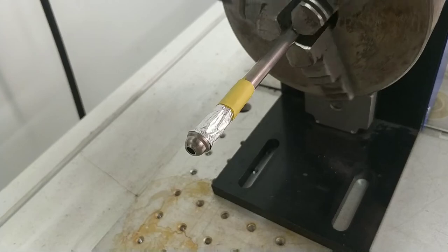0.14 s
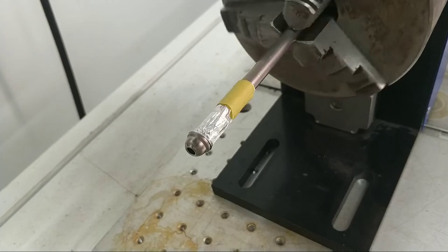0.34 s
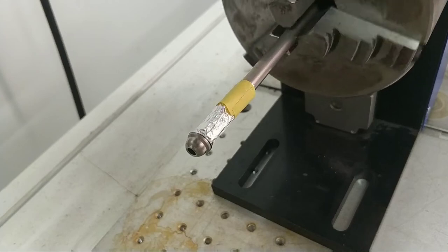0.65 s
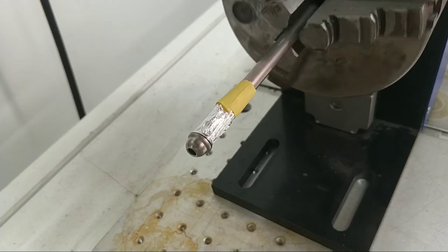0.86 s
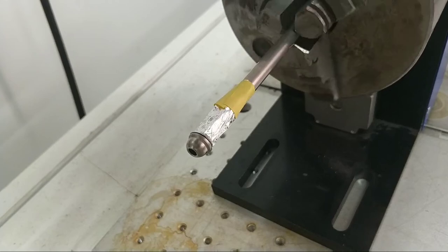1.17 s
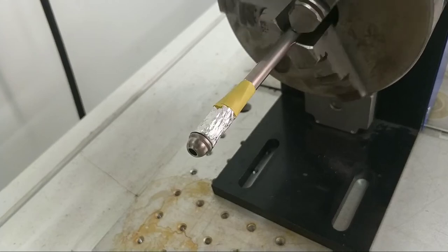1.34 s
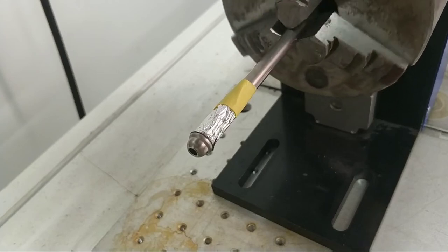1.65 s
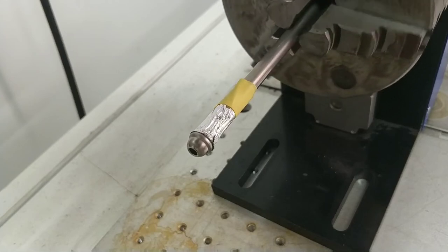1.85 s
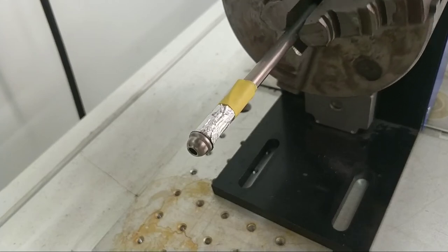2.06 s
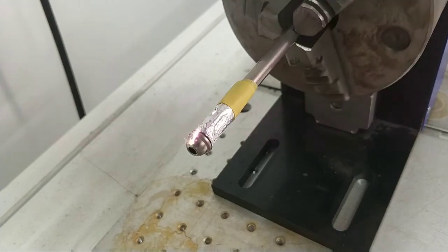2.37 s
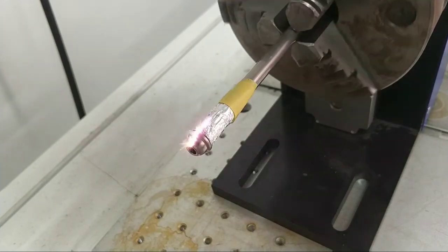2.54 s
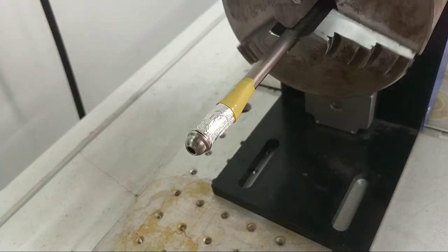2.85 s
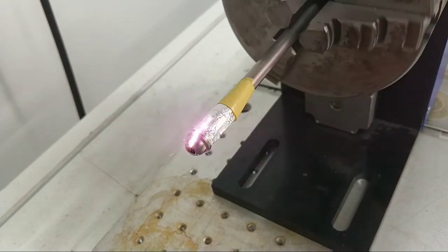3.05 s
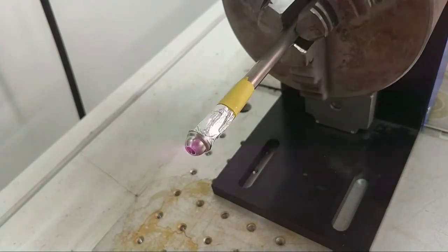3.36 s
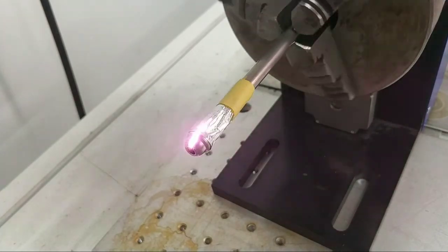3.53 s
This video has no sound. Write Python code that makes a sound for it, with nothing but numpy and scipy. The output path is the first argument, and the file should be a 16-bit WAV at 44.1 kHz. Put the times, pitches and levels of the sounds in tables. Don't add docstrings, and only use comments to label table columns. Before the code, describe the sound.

A laser crackles on a turning metal part in a workshop. After brief silence, a steady low fan hum with airy duct noise and thin motor whine fades in by 0.3 s. At about 2.2 s gas bursts into a fluttering hiss and sharp metallic snaps begin, roughly thirty per second in groups of three, making the hum throb. They weaken toward 3.7 s as the nearby phone lowers its gain.

```python
import sys
import numpy as np
from scipy import signal
from scipy.io import wavfile
from scipy.ndimage import uniform_filter1d

SR = 44100
rng = np.random.default_rng(int(sys.argv[2]) if len(sys.argv) > 2 else 0)


def transcribe(u):
    v = np.clip(np.atleast_2d(u).T, -1, 1)
    q = np.round(v * 32767).astype(np.int16)
    wavfile.write(sys.argv[1], SR, q)


def boost_factor(decibels):
    exponent = np.asarray(decibels, float) / 20
    return 10 ** exponent


N = 163170
T = np.arange(N) / SR

# t/s, level/dB
MIC_GAIN = [
    (0, -0.5),
    (1.9, -0.5),
    (2.2, -1),
    (2.6, -1.5),
    (3.1, -3),
    (3.4, -4.5),
    (3.7, -5),
]
# f/Hz, level/dB per Hz
AIR_CURVE = [(40, -62.5), (90, -20), (150, -35), (210, -5), (330, 0.5), (520, -11.5), (750, -4), (1100, -13),
             (1450, -12), (1780, -30), (2650, -37.5), (3900, -24.5), (4500, -26.5), (6500, -25.5),
            (7050, -24.5), (8400, -25.5)]
# f/Hz, width/Hz, level/dB
DUCT_HUMPS = [(2209, 372, 18.5), (3040, 590, 9.5), (9060, 380, 9.5), (6970, 420, -8), (1066, 121, 6),
              (10370, 150, -7), (11000, 660, -30.5), (634, 62, 3.5), (824, 50, -4)]
# f/Hz, level/dB rms
MOTOR_WHINE = [(5852, -69), (5950, -54), (6051, -60), (6148, -69), (6804, -58), (6907, -63)]
# f/Hz, level/dB rms
MOTOR_LOW = [(199.5, -45), (700.5, -41.5), (475, -52), (1067, -53)]
# multiple of shaft rate, level/dB rms
STRONG_ORDERS = [(56, -62), (58, -60), (62, -62), (64, -60.5), (65, -60.5), (66, -55), (68, -62),
                 (74, -61.5), (78, -58.5), (81, -62), (89, -64), (98, -63)]
# t/s, level/dB
HUM_SAG = [
    (1.9, 0),
    (2.4, -2),
    (3.1, 1.5),
    (3.2, -1),
    (3.7, 1),
]
# t/s, share of hum lost
HUM_CANCEL = [(2.29, 0.73), (2.33, 0.4), (2.608, 0.47), (2.688, 0.83), (2.801, 1.15), (2.937, .95),
              (3.017, 1.15), (3.152, .65), (3.35, 0.15), (3.454, 1), (3.675, 1.05)]
# f/Hz, width/Hz, level/dB
JET_BURST = [(2200, 200, -5.5), (3690, 1530, -9), (5760, 800, -4), (6980, 1070, -4), (8800, 1300, -2)]
# f/Hz, width/Hz, level/dB
JET_STEADY = [(7430, 180, 9), (7850, 710, 20.5), (9190, 1800, -8)]
# f/Hz, level/dB rms
JET_WHISTLES = [(6907, -62), (7391, -55), (7494, -58), (7946, -59), (8010, -59), (8080, -55), (8909, -58),
                (9044, -55)]
# t/s, high crack level/dB, low crack level/dB, lift of the hum 0-1
CROSSINGS_EARLY = [(2.2308, -20, -21, 0.9), (2.2614, -37, -33, 0.2), (2.2899, -28, -32, 0.3),
                   (2.3256, -22, -30.5, 0.1), (2.358, -14, -27.5, 0.7), (2.383, -21.5, -25, 0),
                   (2.4383, -19.5, -27.5, 0.25), (2.468, -23, -33.5, 0.45), (2.4942, -24, -34, 0.5),
                   (2.5459, -16, -29.5, 0.2), (2.5747, -24, -32, 0.9), (2.603, -17, -33.5, 0.1),
                   (2.6549, -17, -26, 0.6), (2.6853, -20, -32.5, 0.4), (2.7112, -22, -33, 0.5),
                   (2.765, -22.5, -30.5, 0.8), (2.7924, -25, -35.5, 0.8), (2.822, -25.5, -37.5, 0.5),
                   (2.873, -21.5, -29, 0.6), (2.9024, -24.5, -41, 0.6), (2.9312, -23, -34, 0.7)]
CROSSINGS_LATE = [(2.9829, -22, -26, 0.39), (3.0127, -27, -43, 0.17), (3.041, -25.5, -39, 0.59),
                  (3.0936, -28, -31, 0.29), (3.1241, -26.5, -36.5, 0.49), (3.1527, -20, -42, 0.25),
                  (3.2012, -25, -33.5, 0.29), (3.23, -28, -38, 0.63), (3.2598, -27, -40, 0.22),
                  (3.3103, -22.5, -33.5, 0.2), (3.3392, -30, -37.5, 0.66), (3.37, -28, -37.5, 0.5),
                  (3.42, -27, -32.5, 0.68), (3.4461, -22, -33, 0.22), (3.4764, -21.5, -38, 0.34),
                  (3.5305, -28, -36, 0.18), (3.5626, -29.5, -45, 0.28), (3.5912, -32, -47, 0.32),
                  (3.6376, -26.5, -36, 0.6), (3.6636, -29, -44, 0.25)]
# f/Hz, width/Hz, level/dB
PART_LOW = [(556, 330, -0.5), (1204, 740, 2), (2228, 360, -0.5), (3305, 670, -1), (3906, 400, -1.5),
            (4840, 880, -2)]
# f/Hz, width/Hz, level/dB
PART_HIGH = [(5890, 530, -5.5), (6440, 280, 1.5), (7710, 1100, 3.5), (9170, 1300, 5.5)]
# t/s after onset, level/dB
SNAPS = [
    (.0012, -5.5),
    (.0021, 4.5),
    (.0032, -5),
]


def evened(x):
    return x / np.sqrt(np.mean(x ** 2) + 1e-20)


def slow(rate_hz):
    rates = np.geomspace(.3, rate_hz, num=24)
    return evened(sum(np.sin(2 * np.pi * (f * T + rng.random())) / np.sqrt(f) for f in rates))


def resonate(x, hz, width_hz):
    turn = np.exp(2j * np.pi * hz * T[:len(x)])
    r = np.exp(-np.pi * width_hz / SR)
    return 2 * (turn * signal.lfilter([1 - r], [1, -r], x / turn)).real


def twice_resonate(x, hz, width_hz):
    return resonate(resonate(x, hz, width_hz), hz, width_hz)


def body(x, peaks):
    return sum((-1) ** k * boost_factor(db) / np.sqrt(width) * twice_resonate(x, hz, width)
               for k, (hz, width, db) in enumerate(peaks))


def strike(t, rise, hold, t60):
    release_s = np.clip(t - rise - hold, 0, 3)
    return np.clip(t / rise, 0, 1) * boost_factor(-60 * release_s / t60)


def tones(lines):
    fuzz, width_hz = .4, 14
    noise = rng.standard_normal(N)
    out = np.zeros(N)
    for hz, db in lines:
        clean = np.sqrt(2) * np.sin(2 * np.pi * (hz * T + rng.random()))
        rough = evened(resonate(noise, hz, width_hz))
        out += boost_factor(db) * ((1 - fuzz) * clean + fuzz * rough)
    return out


def duct_air():
    level_db, patch_db, ripple_db, swell_db = -30.5, 2.56, 1.5, 0.53
    frames, hz = N // 256 + 5, np.fft.rfftfreq(1024, 1 / SR)
    a, b, patches = rng.standard_normal((frames, 513, 3)).T
    patches = uniform_filter1d(patches, size=4, axis=0)
    patches = evened(uniform_filter1d(patches, size=20, axis=1))
    f, level = np.transpose(AIR_CURVE)
    shape_db = np.interp(np.log(hz + 1), np.log(f + 1), level)
    shape_db = shape_db + sum(db * np.exp(-((hz - c) / w) ** 2) for c, w, db in DUCT_HUMPS)
    ripple = ripple_db * rng.standard_normal((len(hz), 1))
    spectrum = (a + 1j * b) * boost_factor(shape_db[:, None] + ripple + patch_db * patches)
    noise = signal.istft(spectrum, nperseg=1024, noverlap=768)[1][:N]
    return boost_factor(level_db + swell_db * slow(4.68)) * evened(noise)


def blade_tone():
    hum_hz, hum_db, wobble_db, wander_rad = 296.35, -22, 1, 0.25
    lift_lag_s, lift_s, cancel_s = 0.0019, 0.0064, .009
    crossings = CROSSINGS_EARLY + CROSSINGS_LATE
    beat = 1 + sum(k * np.exp(-((T - s - lift_lag_s) / lift_s) ** 2) for s, _, _, k in crossings)
    beat = beat - sum(k * np.exp(-((T - s) / cancel_s) ** 2) for s, k in HUM_CANCEL)
    level_db = hum_db + np.interp(T, *np.transpose(HUM_SAG)) + wobble_db * slow(25)
    return np.sqrt(2) * beat * boost_factor(level_db) * np.cos(2 * np.pi * hum_hz * T + wander_rad * slow(12))


def motor():
    shaft_hz, comb_db, spread_db = 48.886, -70, 3.5
    levels = dict(zip(range(48, 96), comb_db + spread_db * rng.standard_normal(48)))
    levels.update(STRONG_ORDERS)
    shaft = 2 * np.pi * shaft_hz * T + 0.012 * slow(0.71)
    comb = sum(np.sqrt(2) * boost_factor(db) * np.sin(k * shaft + 2 * np.pi * rng.random())
               for k, db in levels.items())
    return comb + tones(MOTOR_WHINE + MOTOR_LOW)


def gas_jet():
    start_s, rise_s, hold_s, t60_s = 2.169, .013, .014, 0.44
    burst_db, steady_db = -20, -44.5
    flutter_hz, flutter_depth = 140, .3
    t = T - start_s
    flutter = evened(resonate(rng.standard_normal(N), flutter_hz, 120))
    flutter = np.maximum(1 + flutter_depth * flutter, 0)
    burst = evened(body(rng.standard_normal(N), JET_BURST))
    burst = boost_factor(burst_db) * strike(t, rise_s, hold_s, t60_s) * burst
    hiss = boost_factor(steady_db) * evened(body(rng.standard_normal(N), JET_STEADY)) + tones(JET_WHISTLES)
    return flutter * (burst + np.clip(t / 0.15, 0, 1) * hiss)


def ring_part(drive, peaks):
    click = np.eye(1, 600)[0]
    return body(drive, peaks) / abs(body(click, peaks)).max()


def laser():
    lead_s, rise_s, hold_s, t60_s = .006, .005, .008, .035
    sizzle_db, spark_db, high_trim_db, low_trim_db = -24, 4, -2, 8.5
    snap_jitter_s, snap_spread_db = 0.00061, 0.5
    push_hz, push_width_hz, push_db = 208.7, 50, -42.5
    thud_hz, thud_width_hz, thud_db, thud_spread_db = 45, 40, -78, 4
    spark_swing = np.minimum(rng.exponential(1, N), 4)
    sparks = evened(rng.standard_normal(N) * boost_factor(spark_db * spark_swing))
    low, high, push, thud = np.zeros((4, N))
    crossings = CROSSINGS_EARLY + CROSSINGS_LATE
    for (s, high_db, low_db, _), luck in zip(crossings, rng.standard_normal((len(crossings), 10))):
        back_db = -np.interp(s, *np.transpose(MIC_GAIN))
        drive = boost_factor(sizzle_db) * sparks * strike(T - s + lead_s, rise_s, hold_s, t60_s)
        for (lag, db), (late, sign, size) in zip(SNAPS, luck[1:].reshape(len(SNAPS), -1)):
            at = round((s + lag + snap_jitter_s * late) * SR)
            drive[at] += np.sign(sign) * boost_factor(db + snap_spread_db * size)
        high += boost_factor(high_db + high_trim_db + back_db) * drive
        low += boost_factor(low_db + low_trim_db + back_db) * drive
        push[round(s * SR)] = 1
        thud[round(s * SR)] = boost_factor(thud_spread_db * luck[0])
    rings = ring_part(low, PART_LOW) + ring_part(high, PART_HIGH)
    push = evened(twice_resonate(push, push_hz, push_width_hz))
    thud = evened(twice_resonate(thud, thud_hz, thud_width_hz))
    return rings + boost_factor(push_db) * push + boost_factor(thud_db) * thud


def scene():
    rumble_cut = signal.butter(4, 115, "high", fs=SR, output="sos")
    background = duct_air() + blade_tone() + motor() + gas_jet()
    return (signal.sosfilt(rumble_cut, background) + laser())[None]


def low_pass(x):
    return signal.sosfilt(signal.butter(12, 11100, fs=SR, output="sos"), x)


def record(dry):
    fade_start_s, fade_s, fade_bend = .117, .2, 1.25
    slope_hz, slope_db_per_khz, edge_hz = 10290, -26.5, 11150
    fade = np.clip((T - fade_start_s) / fade_s, 0, 1) ** fade_bend
    gain = fade * boost_factor(np.interp(T, *np.transpose(MIC_GAIN)))
    hz = np.linspace(0, SR / 2, num=513)
    slope = slope_db_per_khz * np.maximum(hz - slope_hz, 0) / 1000
    edge = -90 * np.clip((hz - edge_hz) / 300, 0, 1)
    colour = boost_factor(slope + edge) * (hz < SR / 2)
    taps = signal.firwin2(401, hz, colour, window=("kaiser", 8), fs=SR)
    mix = signal.oaconvolve(dry, taps[None], "same") * gain
    return low_pass(mix)


dry = scene()
out = record(dry)
transcribe(out)
```